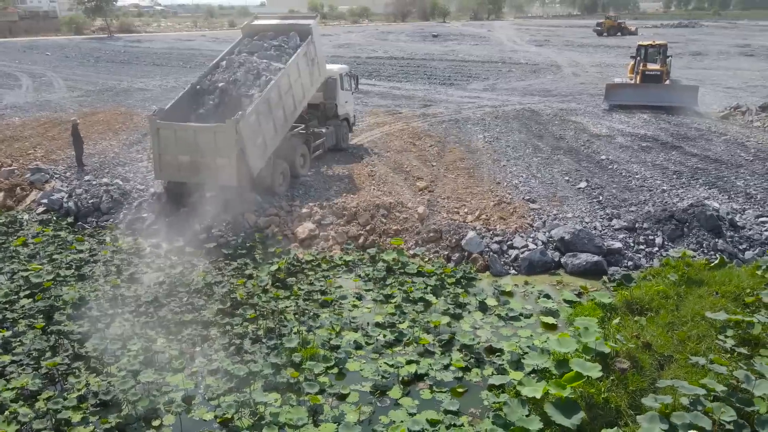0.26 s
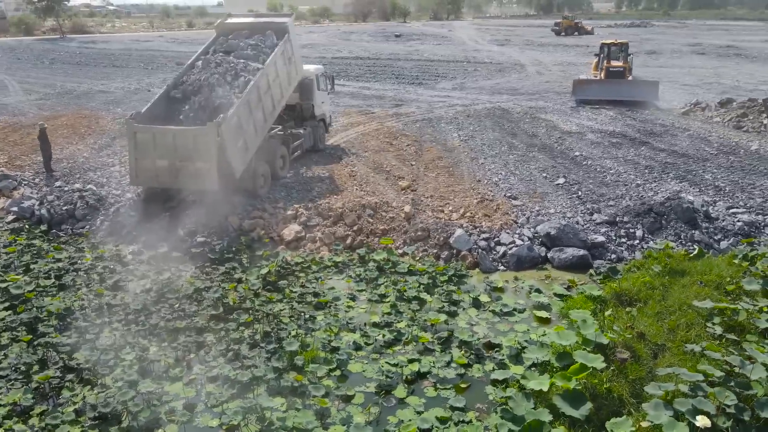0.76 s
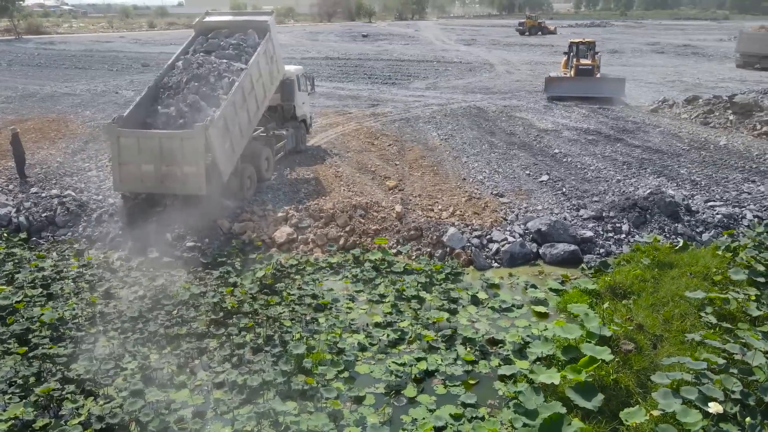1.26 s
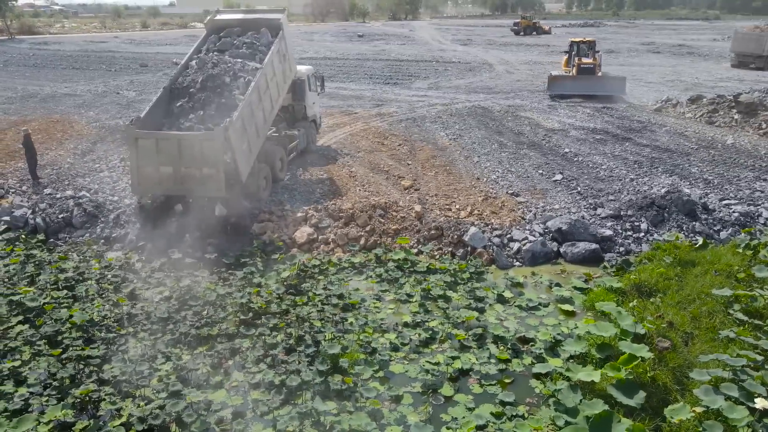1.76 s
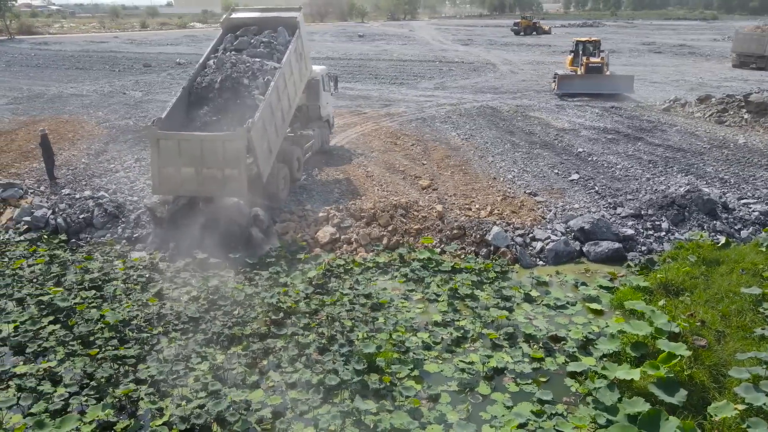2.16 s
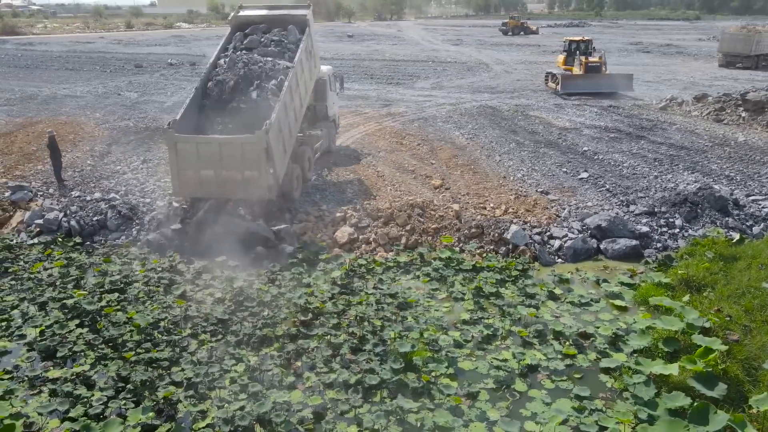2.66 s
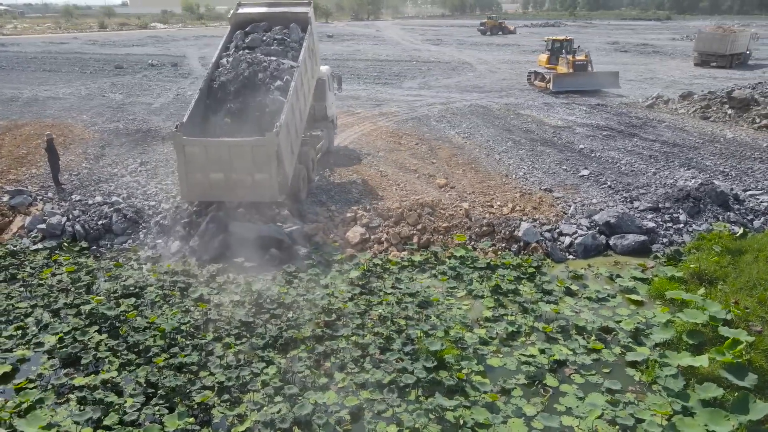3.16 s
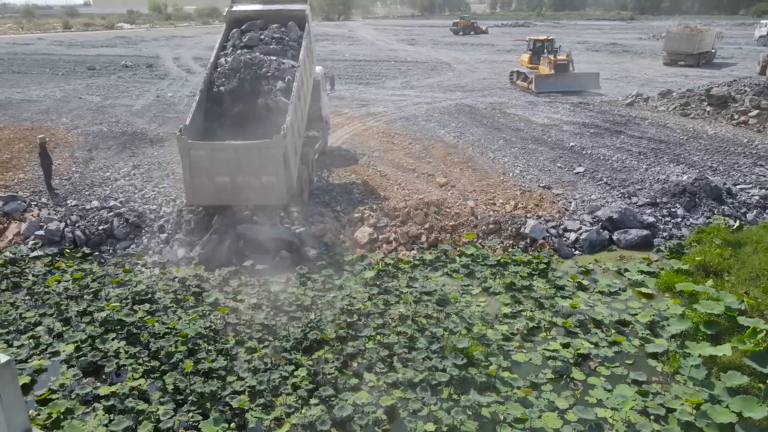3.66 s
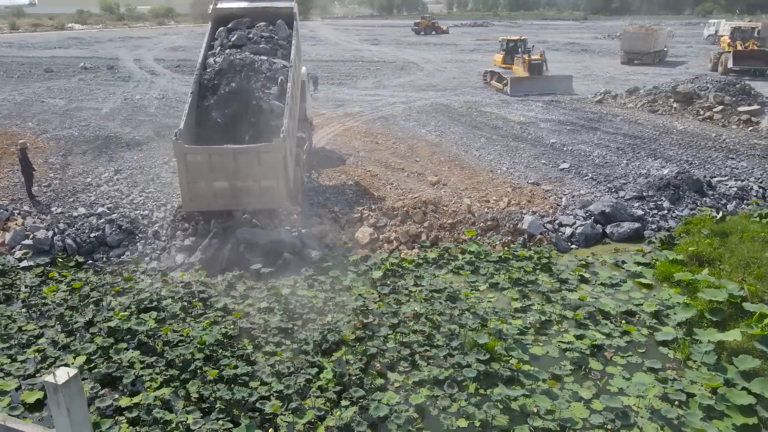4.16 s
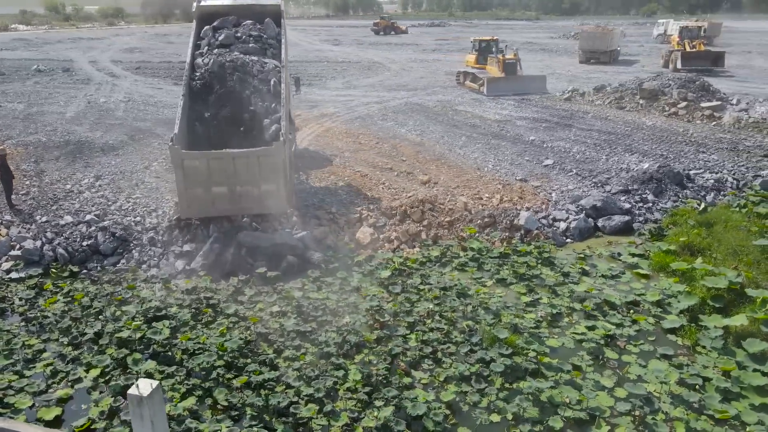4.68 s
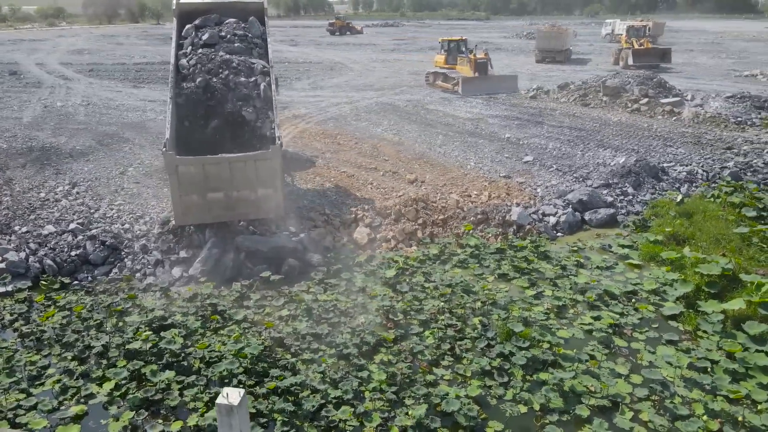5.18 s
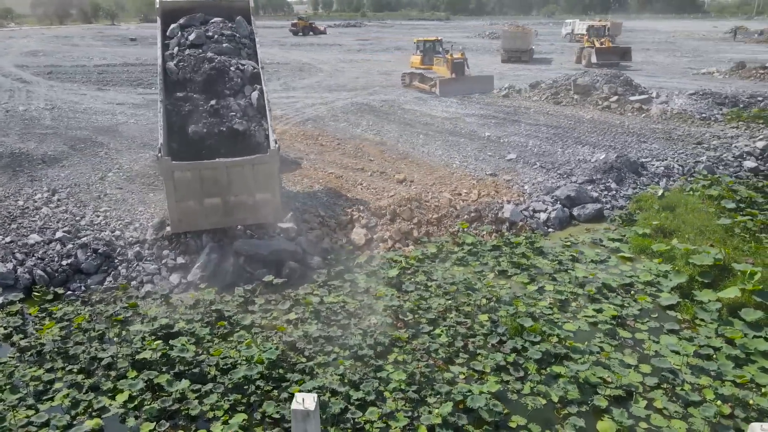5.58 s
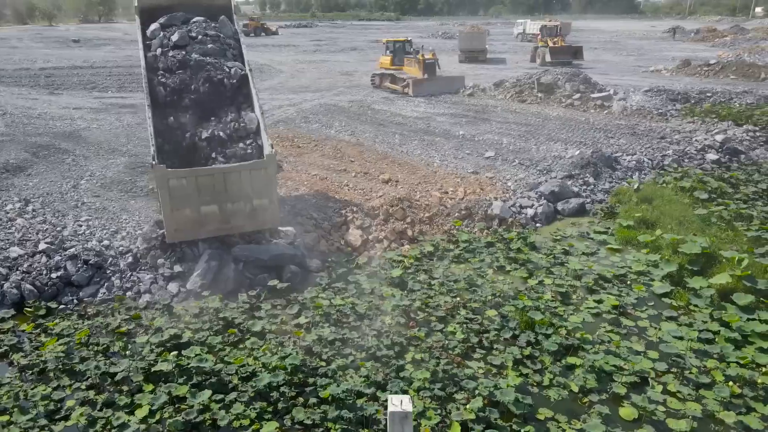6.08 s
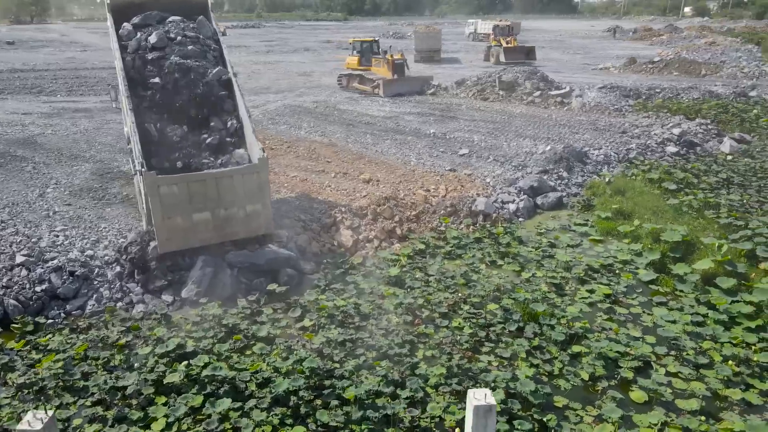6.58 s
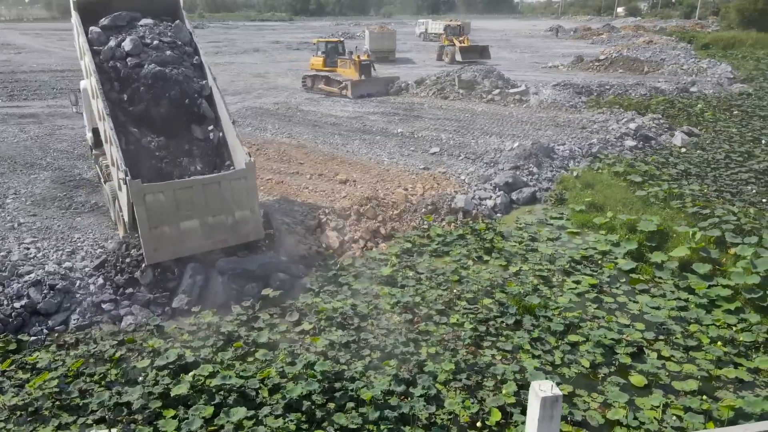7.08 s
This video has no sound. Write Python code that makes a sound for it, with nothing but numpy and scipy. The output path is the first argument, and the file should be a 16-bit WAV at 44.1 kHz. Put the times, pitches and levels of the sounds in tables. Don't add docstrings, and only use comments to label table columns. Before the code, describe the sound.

Heavy stones tumble from a raised metal truck bed with hollow bangs, dull thuds and gritty crunches, while diesel engines roar steadily behind.

```python
import sys
import numpy as np
from scipy import signal
from scipy.fft import rfft, irfft, next_fast_len
from scipy.io import wavfile
from scipy.ndimage import uniform_filter1d

SR = 44100
rng = np.random.default_rng(int(sys.argv[2]) if len(sys.argv) > 2 else 0)


def volts_from_db(level):
    exponent = np.asarray(level, float) / 20
    return 10 ** exponent


def transcribe(u):
    v = np.clip(np.atleast_2d(u).T, -1, 1)
    q = np.round(v * 32767).astype(np.int16)
    wavfile.write(sys.argv[1], SR, q)


N = 323253

# time_s, firing_hz, level_db
TRUCK_SPEED = [(0, 71.05, -25.5), (.5, 71.27, -26), (1.3, 70.26, -25), (2.8, 71.32, -27), (3.7, 71.28, -26),
               (4.2, 72.2, -28.5), (4.7, 72.27, -27.5), (5.6, 71.8, -30.5), (6.15, 71.7, -33.5),
               (6.6, 70.75, -40), (7.33, 67.9, -31)]
# pitch_hz, level_db, t60_s
BED_MODES = [(362, -1.5, 0.051), (431, -28, 0.023), (517, -6, 0.14), (630, 0, 0.055), (706, 4, 0.042),
             (782, -17, 0.081), (860, 0, 0.094), (970, -8, 0.15), (1187, -2, 0.078), (1304, 3, 0.063),
             (1630, 2.5, 0.06), (1874, -1.5, 0.044)]
# pitch_hz, level_db, t60_s
CHIP_MODES = [(3107, 5, 0.015), (3380, 1.5, 0.032), (4030, 11, 0.0029), (5450, 8.5, 0.0053),
              (6600, -2, 0.0065), (7440, -17, 0.0036), (9000, -46, 0.0032), (10000, -12, 0.005)]
# freq_hz, level_db
DULL_CRUNCH = [(50, -34), (200, -11.5), (500, 5.5), (1000, 2.5), (1900, -3), (2800, -11), (5000, -20),
               (10000, -30)]
# freq_hz, level_db
BRIGHT_CRUNCH = [(700, -26), (1800, -2.5), (3200, -6), (5500, -2), (7000, -7), (9500, -2), (11000, -5.5)]


def evened(x):
    return x / np.sqrt(np.mean(x ** 2) + 1e-20)


def read(points, hz):
    f, value = np.transpose(points)
    return np.interp(np.log(hz + 1), np.log(f + 1), value)


def colour(x, points):
    length = x.shape[-1]
    size = next_fast_len(length)
    gain = volts_from_db(read(points, np.fft.rfftfreq(size, 1 / SR)))
    return irfft(rfft(x, size) * gain, size)[..., :length]


def along(rows):
    s, *columns = np.transpose(rows)
    return [np.interp(np.arange(N) / SR, s, c) for c in columns]


def drift(rate_hz):
    lowpass = signal.butter(2, rate_hz, fs=SR / 32, output="sos")
    slow = signal.sosfilt(lowpass, rng.standard_normal(N // 32 + 2))
    return np.interp(np.arange(N) / 32, np.arange(len(slow)), evened(slow))


def add(mix, s, sound):
    part = mix[..., round(s * SR):][..., :sound.shape[-1]]
    part += sound[..., :part.shape[-1]]


def roar():
    # time_s, level_db
    roar_level = [(0.0, -22), (0.41, -24.5), (1.47, -25.5), (3.47, -26), (3.57, -27), (6.1, -29),
                  (6.72, -28), (7.02, -28.5), (7.33, -28.5)]
    # freq_hz, density_db (per hertz)
    roar_colour = [(28, -40), (48, -35), (65, 9), (110, -1.5), (250, -3.5), (600, -6), (1100, -13.5),
                   (1400, -13.5), (1700, -12), (2400, -16), (3100, -24), (6800, -31), (9000, -25),
                   (10800, -20.5)]
    frames, hz = N // 256 + 5, np.fft.rfftfreq(1024, 1 / SR)
    a, b, c, d, patches = rng.standard_normal((frames, 513, 5)).T
    patches = evened(uniform_filter1d(uniform_filter1d(patches, 10, 0), 12, 1))
    level_db = np.interp(np.arange(frames) * 256 / SR, *np.transpose(roar_level))

    bass_hz, bass_follows = 196, 0.13
    follows = 1 - (1 - bass_follows) / (1 + (hz / bass_hz) ** 4)
    swell_db = follows[:, None] * (level_db - level_db.mean())

    air_hz, air_db = 10600, 1.8
    swell_db += (hz > air_hz)[:, None] * air_db * np.resize(drift(9)[::256], frames)

    shape_db = read(roar_colour, hz)[:, None] + 1.2 * patches + swell_db
    z = np.array([a + 1j * b, c + 1j * d]) * volts_from_db(shape_db)
    noise = signal.istft(z, nperseg=1024, noverlap=768)[1][:, :N]
    firing_db = 0.15 * np.cos(2 * np.pi * np.cumsum(along(TRUCK_SPEED)[0]) / SR)
    return volts_from_db(level_db.mean() + 0.81 + firing_db) * evened(noise)


def tone(hz, db, flutter_db, wander):
    turns = np.cumsum(hz * (1 + wander * drift(12.5))) / SR + rng.random()
    turns = turns + [0 * turns, 0.13 + 0.11 * drift(2.1)]
    return np.sqrt(2) * volts_from_db(db + flutter_db * drift(26.0)) * np.sin(2 * np.pi * turns)


def diesel(rows, orders_db, flutter_db):
    hz, db = along(rows)
    rise_db = 2.5 * (hz - hz.mean())
    return sum(tone((k + 1) * hz, db + order_db + k * rise_db, (k + 1) * flutter_db, wander=0.0026)
               for k, order_db in enumerate(orders_db))


def bulldozer():
    # time_s, firing_hz, level_db
    dozer_speed = [(0, 89, -39), (.5, 86.75, -36), (1.3, 88, -40), (1.8, 88, -39), (2.3, 88.8, -40),
                   (2.75, 88.5, -30), (3.1, 88.4, -37), (3.5, 88.24, -34.5), (4.3, 88, -39),
                   (5.2, 88.5, -43), (5.65, 89, -32.5), (6.3, 89.36, -35.5), (7.33, 88.1, -36.5)]
    orders_db = (1.5, -12)
    return diesel(dozer_speed, orders_db, flutter_db=1.2)


def truck():
    orders_db = (-1.5, -18, -15)
    return diesel(TRUCK_SPEED, orders_db, flutter_db=1.5)


def whine(rows, flutter_db, wander):
    t = np.arange(N) / SR
    fade = np.clip(np.minimum(t - rows[0][0] + 0.02, rows[-1][0] - t) / 0.03, 0, 1)
    return fade * tone(*along(rows), flutter_db, wander)


def whines():
    # time_s, pitch_hz, level_db; pump and pump_high are two harmonics of the hoist pump
    fan = [(2.4, 233.3, -45), (2.65, 233, -37), (2.95, 234.2, -31.5), (3.4, 241, -34.5), (3.6, 238, -44),
           (4.5, 243, -42), (5.75, 243.3, -44), (5.88, 239, -42), (5.95, 240.6, -30.5), (6.25, 240, -32.5),
           (6.47, 251, -38.5), (6.75, 238, -37.5), (6.95, 236, -46)]
    pump = [(3.5, 868, -67), (3.8, 864, -39.5), (4.3, 866, -38), (5.0, 875, -40), (5.15, 870, -58)]
    pump_high = [(3.5, 1022, -47), (3.85, 1030, -42), (4.5, 1040, -43), (5.1, 1050, -41), (5.3, 1052, -47),
                 (5.9, 1055, -46)]
    final_drive = [(0, 2230, -55), (1.8, 2430, -47), (2.2, 2330, -50), (4.8, 2390, -54), (5.2, 2360, -54),
                   (6.5, 2350, -54), (7.33, 2340, -62)]
    turbo = [(0, 9340, -45), (.3, 9440, -44), (.55, 9300, -56), (.8, 9150, -69), (1.2, 8980, -53),
             (1.5, 9000, -54), (1.8, 9000, -54), (2.07, 8920, -48), (2.2, 8910, -55), (2.4, 8920, -51),
             (2.58, 8920, -60), (2.7, 9000, -45), (2.8, 8960, -56), (2.9, 8780, -53), (3.05, 8700, -62),
             (3.7, 8850, -81)]
    lines = whine(fan, 2.3, 0.0019) + whine(pump, 1.96, 0.0051) + whine(pump_high, 3.1, 0.0085)
    return lines + whine(final_drive, 1.3, 0.001) + whine(turbo, 1.8, 0.00202)


def stones(crunch, count, cycles):
    hz = np.exp(rng.uniform(np.log(crunch[1][0]), np.log(crunch[-2][0]), count))
    return list(zip(hz, read(crunch, hz), cycles / hz))


def strike(x, hz, db, t60):
    r, w = volts_from_db(-60 / (t60 * SR)), 2 * np.pi * hz / SR
    return signal.lfilter([0, volts_from_db(db) * r * np.sin(w)], [1, -2 * r * np.cos(w), r ** 2], x + 1e-18)


def knocks(modes, crunch, ring_db, per_s, spread_db):
    size = volts_from_db(spread_db * np.minimum(rng.exponential(1, (2, N)), 4))
    size *= rng.random((2, N)) < per_s / SR
    size *= rng.choice([-1, 1], (2, N))
    rings = modes + stones(crunch, count=14, cycles=72.0)
    spot = rng.integers(0, len(rings), (2, N))
    rung = sum(strike(size * (spot == k), *mode) for k, mode in enumerate(rings))
    return evened(evened(colour(size, crunch)) + volts_from_db(ring_db) * evened(rung))


def surges():
    # time_s, level_db
    flow_level = [(0, -41), (.6, -26.5), (1.7, -32), (2.2, -28.5), (3.1, -30.5), (4.0, -28.5), (4.6, -31),
                  (4.9, -34), (5.6, -31.5), (6.1, -31.5), (6.7, -38), (7.33, -28.5)]
    # peak_s, build_s, die_s, rumble_db, grit_db
    surge_events = [(.07, 0.044, 0.057, -21.5, -31.5), (.135, 0.078, 0.076, -21.5, -38),
                    (.195, 0.047, .03, -28, -33), (.295, 0.0091, .05, -28, -35),
                    (.37, 0.043, 0.17, -23, -31), (.47, 0.13, 0.18, -24.5, -31),
                    (1.81, 0.075, 0.18, -27, -51), (1.924, 0.062, 0.18, -19.5, -33.5),
                    (2.39, 0.044, 0.075, -26, -44), (2.72, 0.022, 0.051, -23, -27.5),
                    (3.02, 0.12, 0.18, -30, -49), (3.29, 0.11, 0.15, -21.5, -37.5),
                    (3.47, 0.16, 0.16, -22.5, -38), (3.78, 0.067, 0.033, -29, -42),
                    (4.15, 0.16, 0.077, -21, -31.5), (4.71, 0.044, 0.14, -27, -55),
                    (5.47, 0.14, 0.25, -23, -31.5), (5.73, 0.022, 0.042, -24.5, -40),
                    (5.9, 0.15, 0.055, -27, -36), (5.96, 0.15, 0.029, -28, -56),
                    (6.15, 0.28, 0.06, -31.5, -41), (6.39, 0.033, 0.052, -25.5, -41),
                    (6.82, 0.041, 0.12, -25.5, -40), (6.99, 0.12, 0.15, -26, -39.5),
                    (7.08, 0.15, 0.044, -22.5, -35.5), (7.29, 0.018, 0.066, -28, -36)]
    t = np.arange(0, N + 32, 32) / SR
    clump_db, clumps_per_s = 2.5, 14
    flow = np.interp(t[:-1], *np.transpose(flow_level)) + clump_db * drift(clumps_per_s)[::32]

    s, build, die, *peaks = np.transpose(surge_events)[..., None]
    before, after = (s - t) / np.maximum(build, .005), (t - s) / np.maximum(die, .005)
    away = np.where(t < s, before, after)[:, :-1]
    drop_db = 14.5 * away ** 1.17
    flow_grit_db = -17.5
    power = [volts_from_db(2 * (flow + under)) + volts_from_db(2 * (peak - drop_db)).sum(0)
             for peak, under in zip(peaks, (0, flow_grit_db))]
    return [np.interp(np.arange(N) / SR, t[:-1], np.sqrt(p)) for p in power]


def slide():
    rumble, grit = surges()
    steel = knocks(BED_MODES, DULL_CRUNCH, ring_db=2.0, per_s=1200, spread_db=2.5)
    chips = knocks(CHIP_MODES, BRIGHT_CRUNCH, ring_db=-1.5, per_s=4000, spread_db=0.5)
    return rumble * steel + grit * chips


def ring(modes, length):
    hz, db, t60 = np.transpose(modes)[..., None]
    t = np.arange(round(length * SR)) / SR
    return volts_from_db(db - 60 * t / t60) * np.sin(2 * np.pi * hz * t)


def blows(events, modes, crunch, own_db, own_t60, trim_db):
    out, t = np.zeros((2, N)), np.arange(4500) / SR
    for s, db, hz, length, ring_db in events:
        rings = ring(modes + stones(crunch, count=12, cycles=40.), .13)
        body = volts_from_db(1.1 * rng.standard_normal(len(rings))) @ rings
        body = body + ring([(hz, own_db, own_t60)], .13)[0]
        contacts = rng.standard_normal((2, len(t))) * volts_from_db(0.29 * rng.exponential(1, len(t)))
        u = t / np.clip(length, .002, .05)
        contacts *= np.exp(-u - 0.088 * u ** 2) * np.minimum(u / 0.1, 1) * (1 + 0.57 * np.exp(-u / 0.4))
        rung = signal.fftconvolve(contacts, body[None])[:, :len(t)]
        sound = evened(colour(contacts, crunch)) + volts_from_db(ring_db + 3.0) * evened(rung)
        add(out, s, volts_from_db(db + trim_db) * sound / abs(sound[0]).max())
    return out


def ticks():
    # start_s, peak_db, pitch_hz, length_s, ring_over_crunch_db
    tick_events = [
        (.005, -29, 10300, 0.011, -12),
        (.962, -32, 10400, .012, -10),
        (1.385, -39, 10100, .01, -5),
        (6.462, -36, 10200, 0.014, -10),
    ]
    # freq_hz, level_db
    fine = [(9000, -40), (9900, 0), (10800, 0), (11900, -12)]
    heard = blows(tick_events, [], fine, own_db=0, own_t60=.01, trim_db=0)
    return heard[0] * [[1], [-1]]


def pings():
    # start_s, peak_db, pitch_hz, length_s, ring_over_crunch_db
    ping_events = [
        (.004, -19.5, 2700, 0.0053, -4),
        (.184, -27.5, 5470, 0.014, 18),
        (.872, -27, 10660, 0.035, 10),
        (2.405, -36, 5460, .006, 12),
        (2.664, -33, 5440, 0.0047, 4),
        (2.775, -41, 5260, .005, 8),
        (3.342, -32, 5450, .005, 8),
        (5.551, -29.5, 5600, 0.0074, 10),
        (6.468, -31, 9900, 0.058, -22),
        (6.472, -48, 5460, 0.022, 6),
    ]
    return blows(ping_events, CHIP_MODES, BRIGHT_CRUNCH, own_db=14.5, own_t60=0.028, trim_db=8.0)


def cracks():
    # start_s, peak_db
    crack_events = [(0.256, -22.5), (0.359, -24), (0.737, -24), (0.852, -22), (0.949, -24), (.995, -26),
                    (1.2258, -21.5), (1.789, -21), (1.861, -24), (1.969, -17.5), (2.366, -14), (2.372, -22),
                    (2.3874, -23), (2.7394, -26), (2.995, -21), (3.0775, -25), (3.227, -22), (3.292, -14.5),
                    (3.447, -20), (3.503, -25), (3.8651, -24.5), (4.0504, -21.5), (4.121, -22),
                    (4.524, -26), (4.686, -22), (4.185, -26), (5.244, -27), (5.43, -23), (5.884, -19),
                    (6.382, -25.5), (6.887, -25.5), (7.019, -20.5), (7.28, -25)]
    hits = [(*r, 3200, 0.027, -6) for r in crack_events]
    return blows(hits, CHIP_MODES, BRIGHT_CRUNCH, own_db=-44, own_t60=0.0054, trim_db=2.5)


def landings():
    # start_s, peak_db, main_ring_hz
    thumps = [(.061, -3.5, 347), (.106, -5, 545), (.108, -12, 280), (0.127, -1.5, 540), (0.183, -11, 1280),
              (0.19, -4, 373), (.289, -3.5, 700), (.328, -9, 325), (.429, -3, 680), (0.484, -6, 403),
              (0.695, -10, 717), (0.85, -6, 534), (1.172, -8.5, 523), (1.939, -13, 800), (2.384, -10, 590),
              (2.419, -23, 318), (2.635, -13, 388), (2.742, -3.5, 797), (3.277, -11, 704),
              (3.297, -2.5, 370), (3.305, -9, 950), (3.315, -10, 520), (3.388, -11, 690), (3.432, -10, 563),
              (3.458, -6, 530), (3.47, -6, 796), (3.765, -8.5, 540), (4.098, -5.5, 658), (4.115, -9, 850),
              (4.131, -6, 860), (4.145, -13, 580), (4.696, -3, 520), (5.343, -12, 425), (5.433, -12, 557),
              (5.466, -4.5, 515), (6.381, -7, 760), (6.385, -10, 1006), (6.802, -9, 1308),
              (6.803, -9.5, 846), (6.833, -13.5, 528), (6.891, -7, 520), (7.03, -9, 700), (7.066, -8, 810),
              (7.088, -8, 870)]
    # start_s, peak_db, main_ring_hz
    thuds = [(0.051, -15, 473), (0.354, -6.5, 555), (.398, -5, 674), (0.636, -18, 517), (0.719, -21, 563),
             (0.784, -23, 482), (.891, -11, 515), (0.995, -10, 544), (1.228, -5.5, 517), (1.373, -19, 334),
             (1.79, -6, 380), (1.918, -6, 566), (2.213, -18, 630), (2.368, -8.5, 544), (2.708, -5, 1210),
             (2.714, -6, 500), (2.829, -19, 454), (2.91, -14, 1900), (2.996, -5.5, 896), (3.075, -8, 1310),
             (3.08, -11, 1852), (3.129, -19, 433), (3.231, -11, 615), (3.444, -2, 525), (3.546, -11, 543),
             (3.981, -11, 657), (4.034, -4.5, 870), (4.185, -6, 835), (4.309, -12, 520), (4.37, -11, 665),
             (4.53, -10, 380), (4.58, -13, 505), (4.946, -9.5, 890), (5.153, -9.5, 450), (5.215, -11, 1022),
             (5.405, -10, 330), (5.546, -6, 525), (5.707, -11, 1140), (5.733, -16, 606), (5.863, -8.5, 518),
             (5.931, -6.5, 530), (5.948, -7, 524), (6.086, -13, 417), (6.133, -11, 835), (6.96, -16, 1150),
             (6.98, -14, 837), (7.01, -9, 690), (7.281, -8, 530)]
    hits = [(*r, 0.01, 7.5) for r in thumps] + [(*r, 0.018, -1.5) for r in thuds]
    return blows(hits, BED_MODES, DULL_CRUNCH, own_db=14, own_t60=0.086, trim_db=-7)


def ports(paths):
    # freq_hz, likeness_0_to_1
    likeness = [(60, .96), (130, .79), (300, .97), (700, .96), (1500, .8), (2500, .46), (3300, .55),
                (4000, .86), (4600, .72), (5500, .8), (6300, .99), (7700, .78), (8500, .995), (9500, .9),
                (10000, .99)]
    same = np.clip(read(likeness, np.fft.rfftfreq(N, 1 / SR)), 0, 1)
    direct, scattered = rfft(paths)
    return irfft([direct, same * direct + np.sqrt(1 - same ** 2) * scattered], N)


def scene():
    machines = roar() + bulldozer() + truck() + whines()
    rocks = slide() + pings() + cracks() + landings()
    return ports(machines + rocks) + ticks()


def top_cut(x):
    return signal.sosfilt(signal.butter(12, 11950, fs=SR, output="sos"), x)


def record(dry):
    # freq_hz, lead_rad
    lead = [(3500, .3), (6800, 0), (7500, .3), (8300, 0), (8850, 0), (9400, -2), (9750, -np.pi),
            (10850, -np.pi), (11180, -2 * np.pi)]
    # freq_hz, left_minus_right_db
    tilt = [(60, .6), (250, 0), (600, .6), (1100, -.4), (2200, -1.9), (3300, 3), (5000, 2.5), (6000, .3),
            (8600, .3), (9300, 1.5), (10000, 0)]
    soft_top, low_hz, edge_hz = .75, 45, 10860
    hz = np.fft.rfftfreq(N, 1 / SR)
    half = volts_from_db(read(tilt, hz) / 2) * np.exp(.5j * read(lead, hz))
    edge = 1 / np.sqrt((1 + (hz / edge_hz) ** 60) * (1 + (low_hz / (hz + 1)) ** 4))
    capsules = soft_top * np.tanh(dry / soft_top)
    return top_cut(irfft(rfft(capsules) * edge * [half, 1 / half], N))


dry = scene()
out = record(dry)
transcribe(out)
```